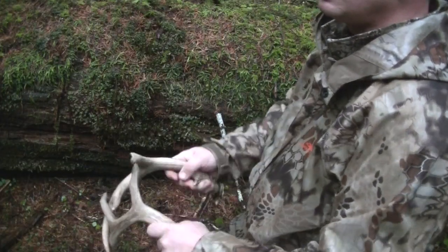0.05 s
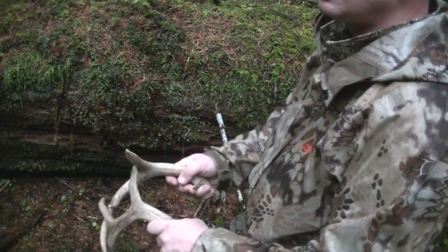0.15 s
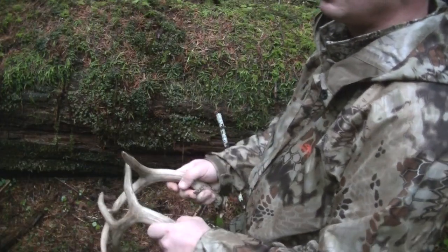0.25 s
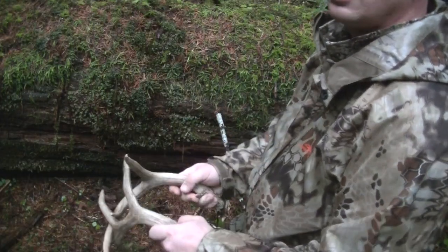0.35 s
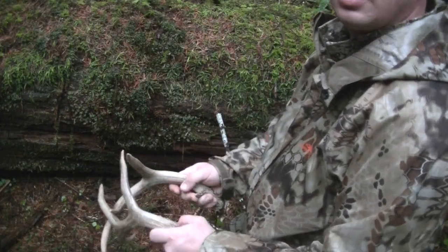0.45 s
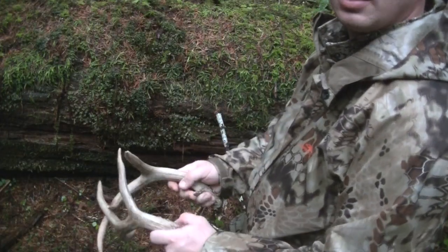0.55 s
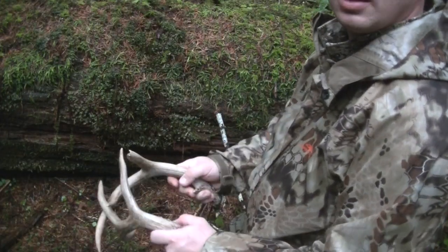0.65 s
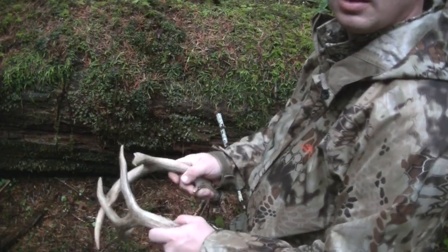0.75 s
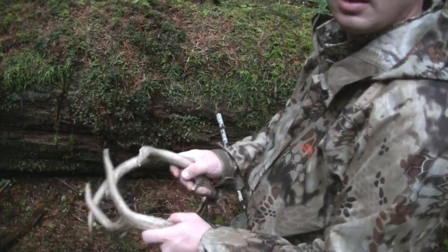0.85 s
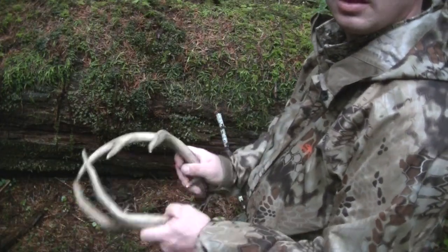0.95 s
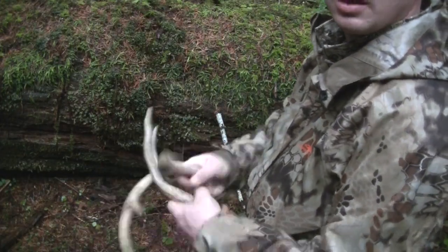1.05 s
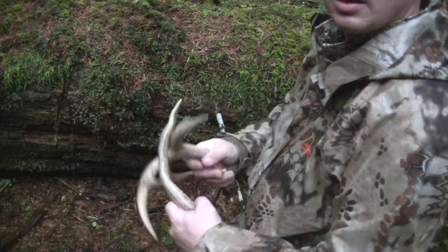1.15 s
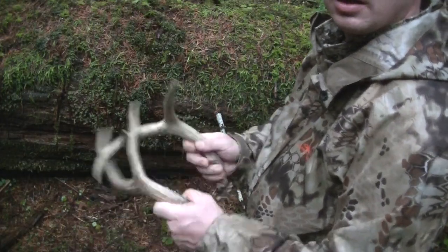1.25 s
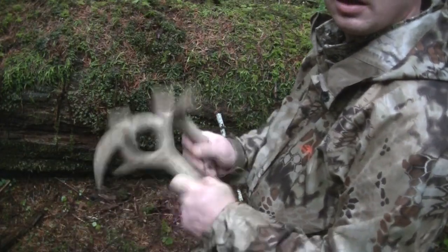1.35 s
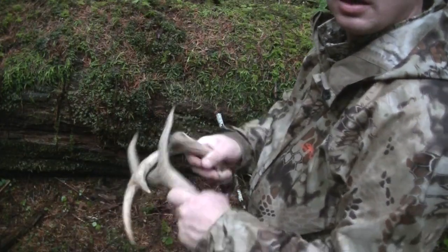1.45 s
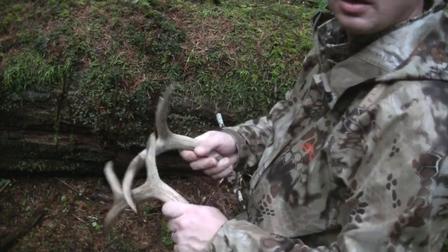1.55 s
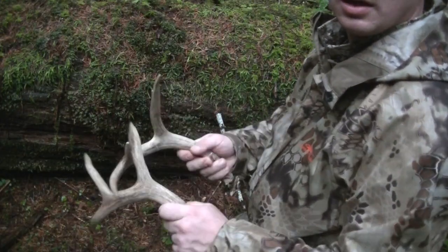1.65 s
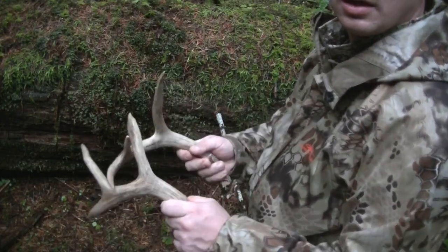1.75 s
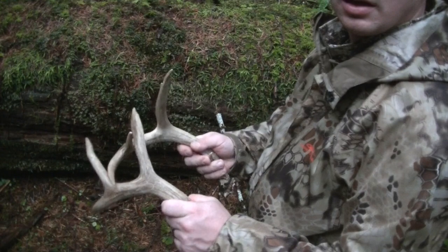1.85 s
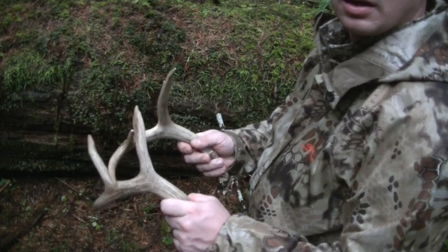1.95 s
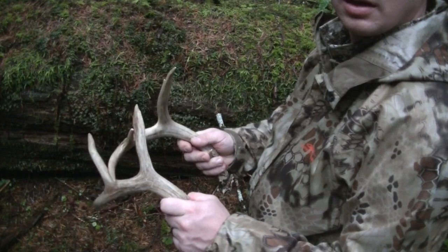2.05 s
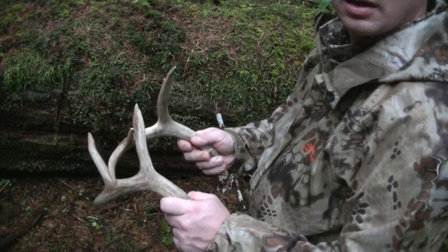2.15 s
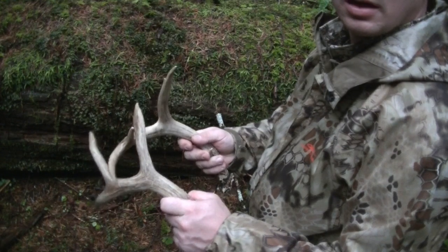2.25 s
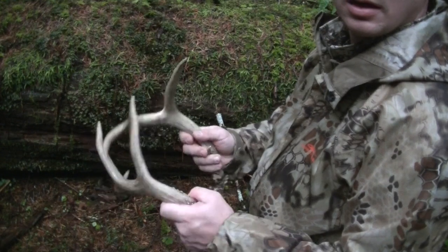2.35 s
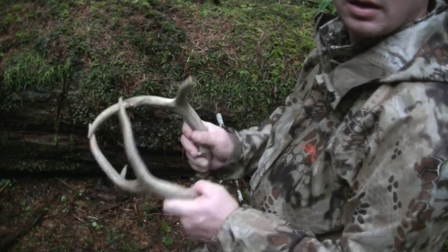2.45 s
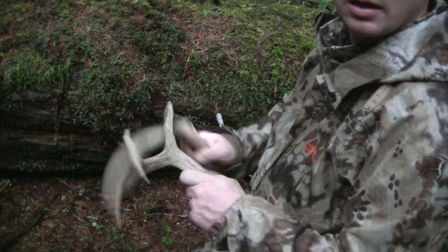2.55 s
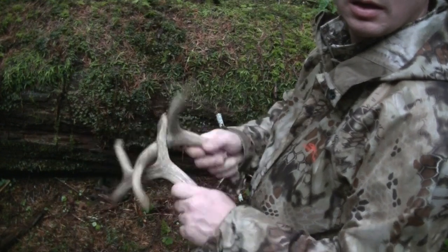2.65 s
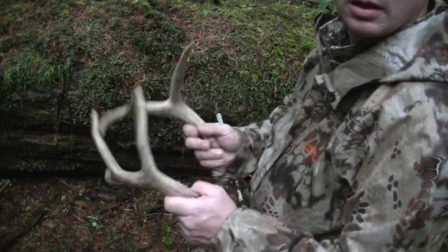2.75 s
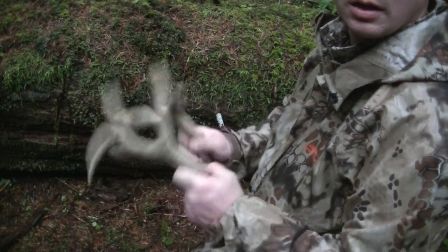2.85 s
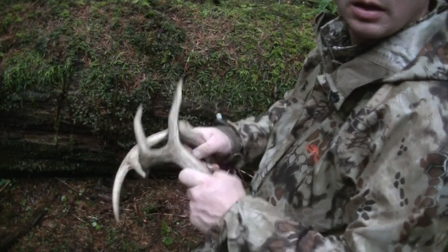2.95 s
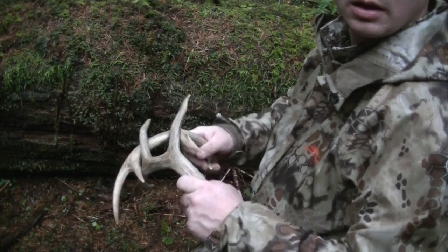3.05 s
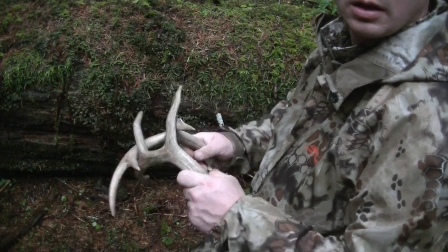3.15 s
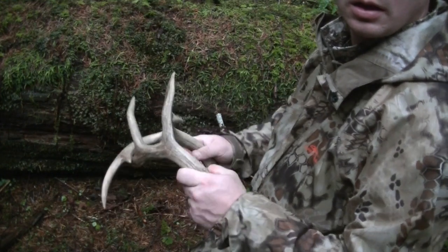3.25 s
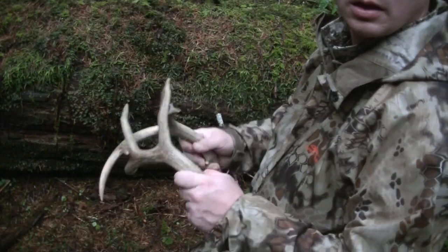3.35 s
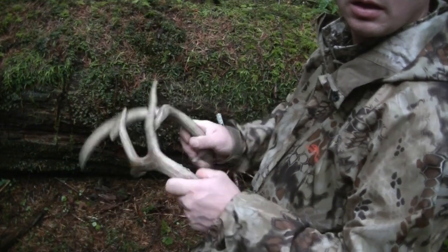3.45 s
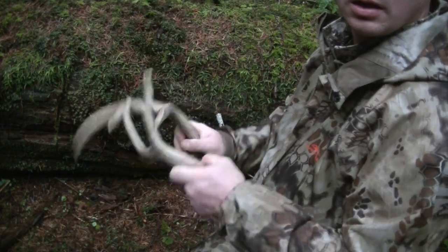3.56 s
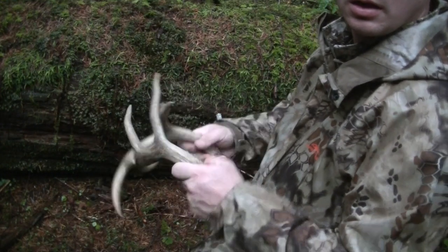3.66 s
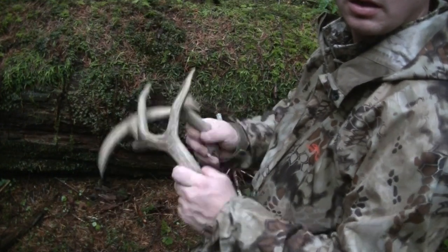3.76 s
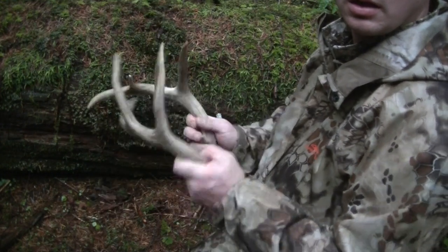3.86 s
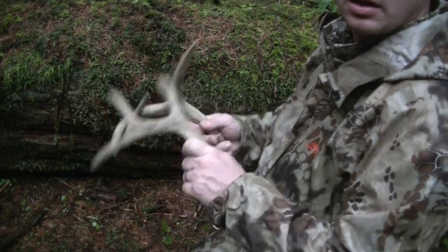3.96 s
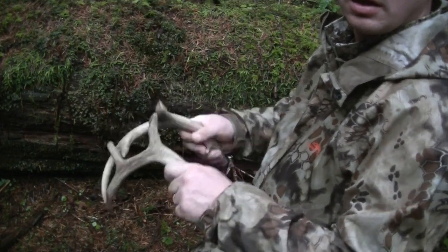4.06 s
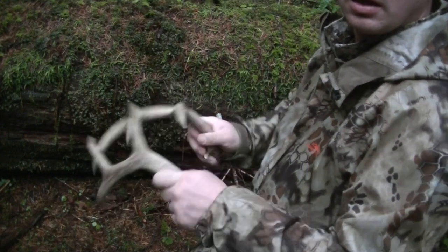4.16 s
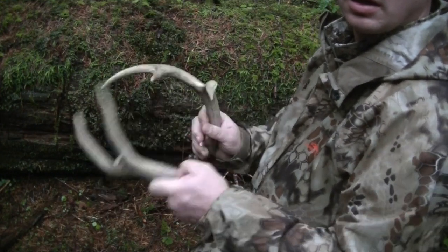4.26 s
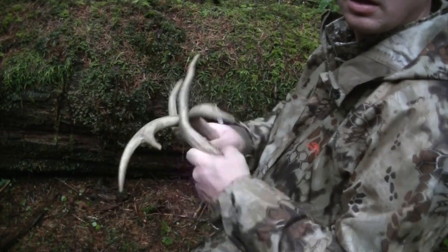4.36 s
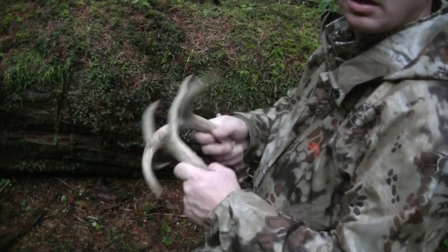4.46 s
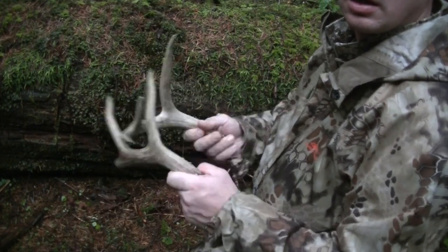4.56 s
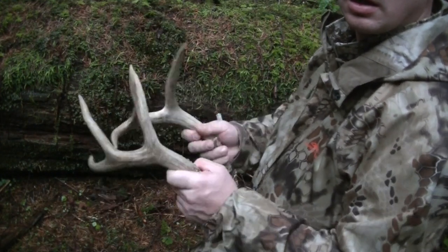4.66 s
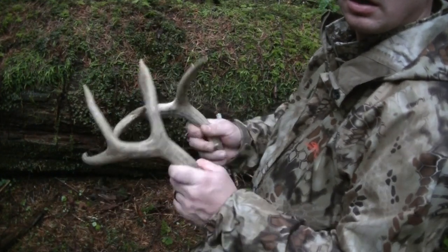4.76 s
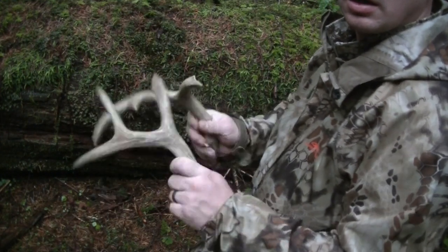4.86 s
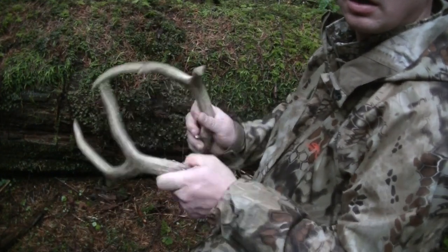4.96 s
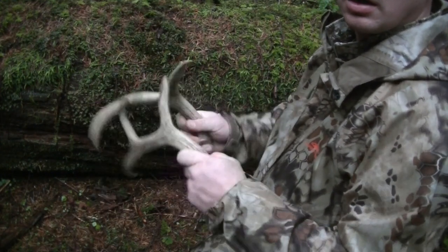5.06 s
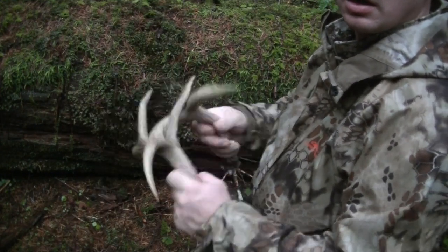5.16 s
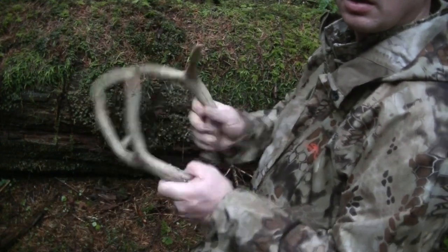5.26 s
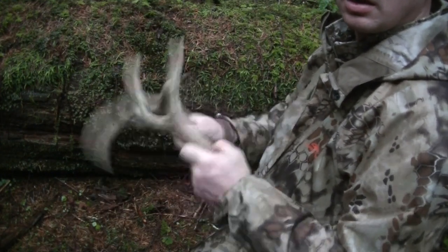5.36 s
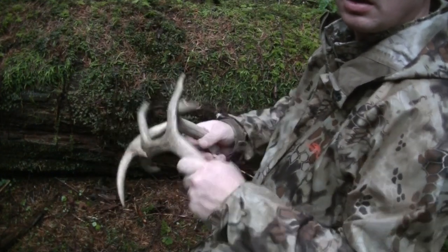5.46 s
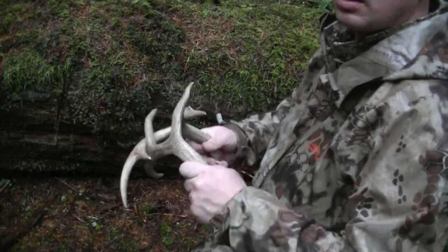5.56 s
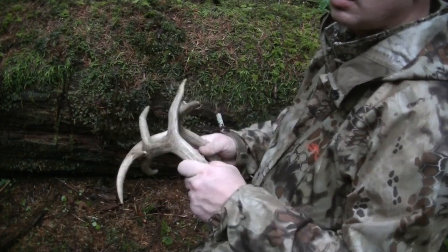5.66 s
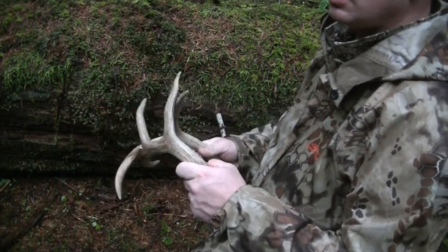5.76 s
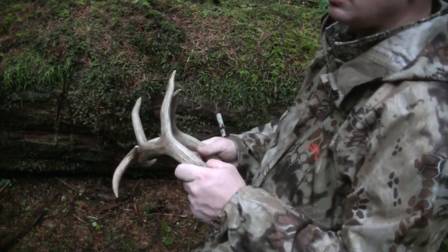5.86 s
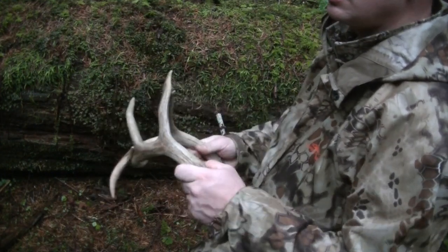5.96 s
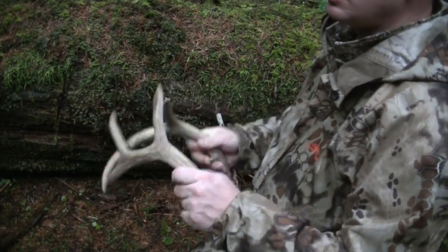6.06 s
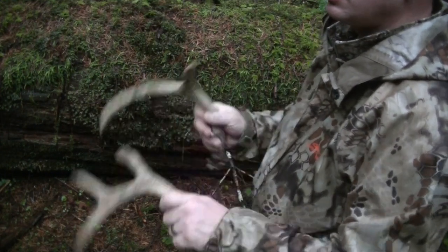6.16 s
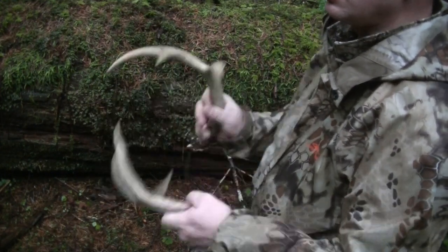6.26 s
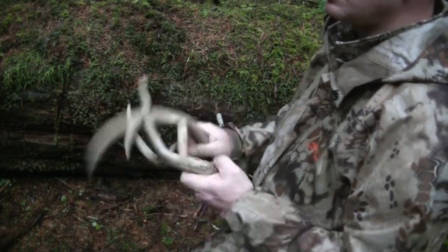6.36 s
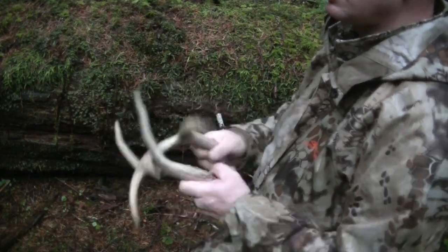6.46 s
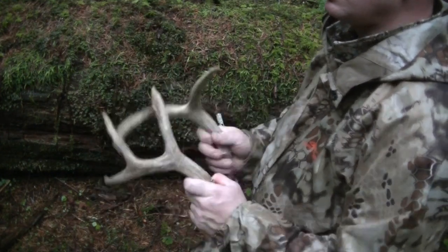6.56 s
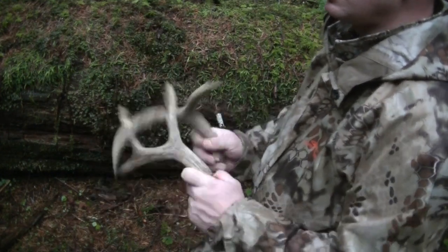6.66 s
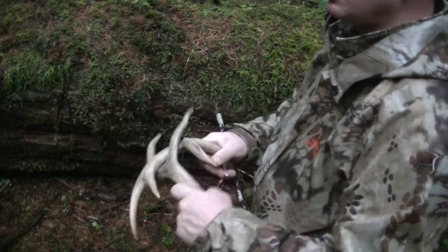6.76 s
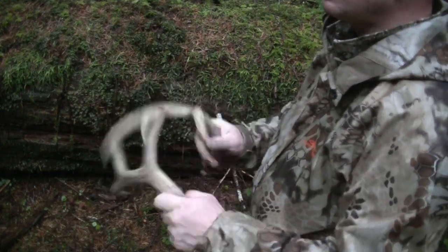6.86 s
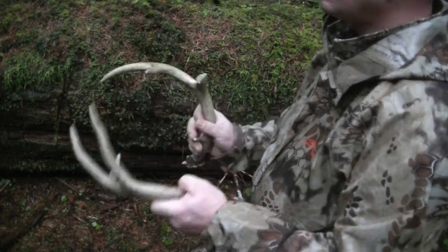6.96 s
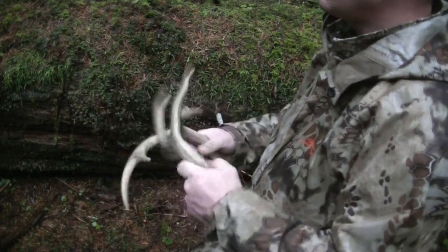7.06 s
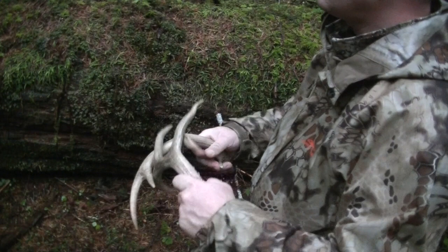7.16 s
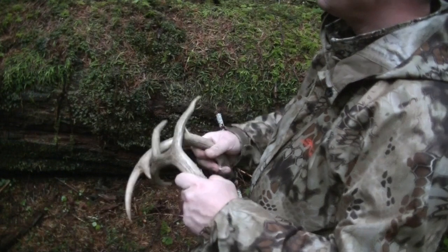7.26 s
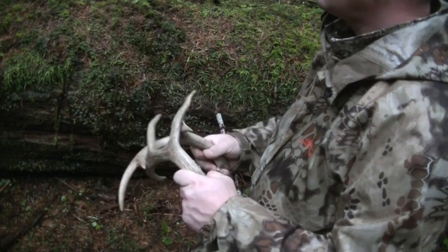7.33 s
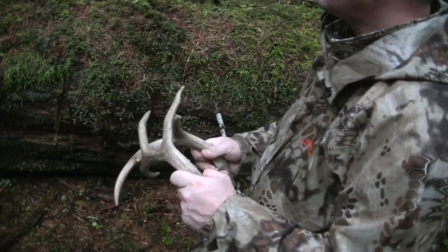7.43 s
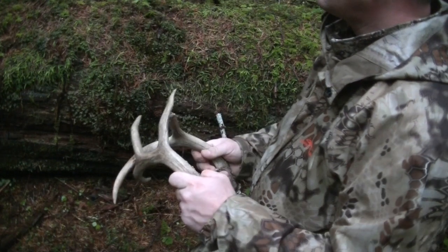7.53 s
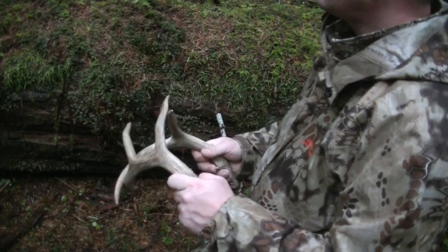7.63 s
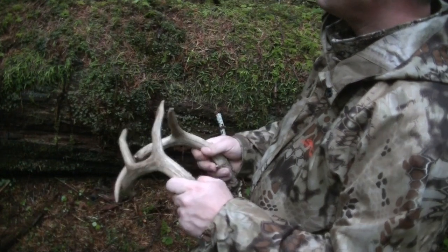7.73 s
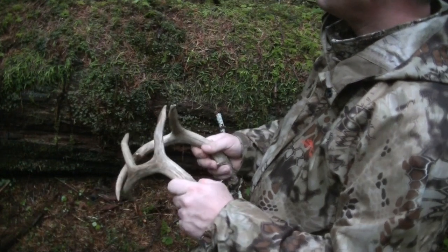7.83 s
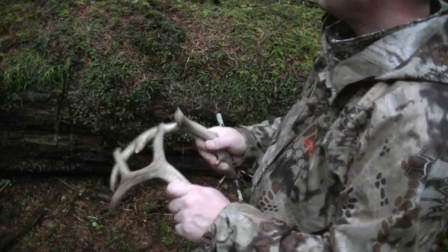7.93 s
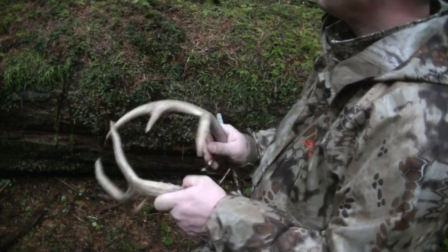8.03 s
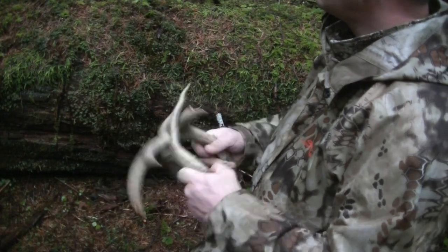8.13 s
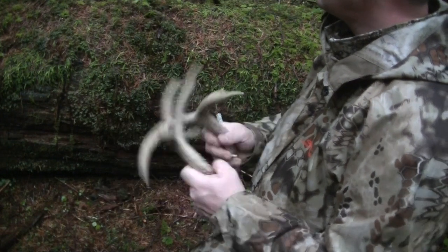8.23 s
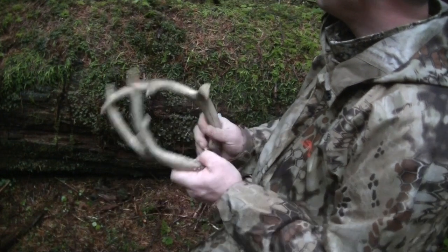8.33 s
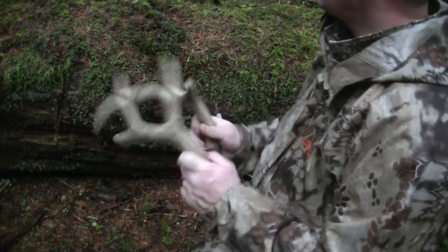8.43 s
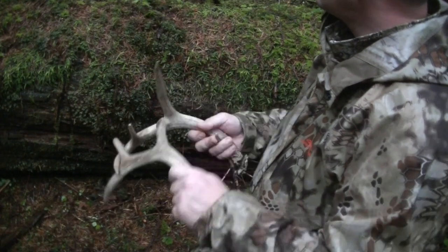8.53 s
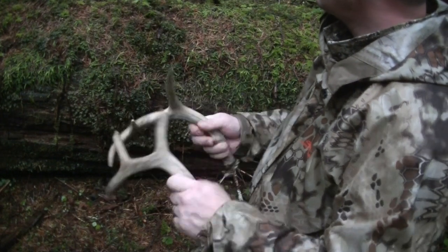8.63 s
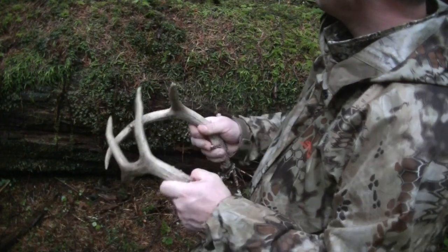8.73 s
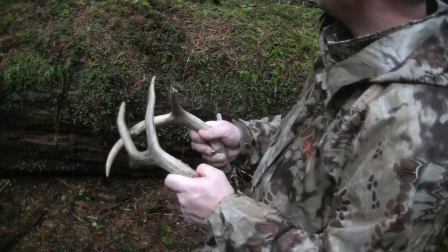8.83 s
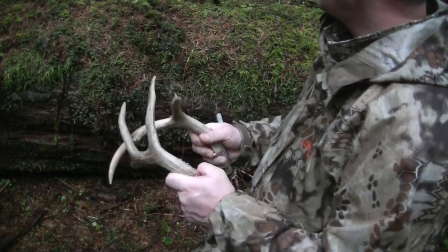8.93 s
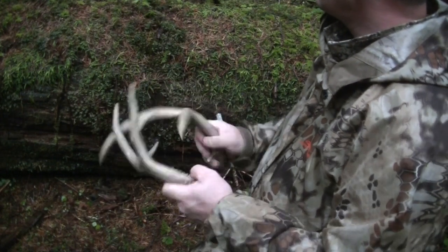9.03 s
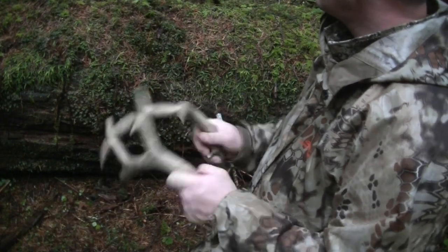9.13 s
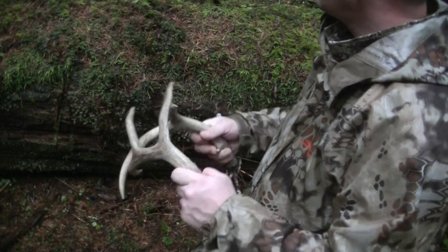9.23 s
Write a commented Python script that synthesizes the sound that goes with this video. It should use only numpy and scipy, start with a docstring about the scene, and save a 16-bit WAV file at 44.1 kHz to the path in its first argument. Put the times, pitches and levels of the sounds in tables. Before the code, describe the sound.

Two deer antlers are clashed and ground together by hand in sharp, dry, bony clacking bursts, close up in a quiet forest.

```python
"""Two deer antlers are clashed and ground together by hand, close to a microphone in a quiet forest.
Each blow sums an impact, decaying noise and bending modes, and a fainter second touch follows it.
Sliding is a run of tiny slips; palms thud on the beams, and one tine springs clear and rings on.
Shaped noise makes the swish of jacket sleeves, the hush of the woods and the echo from the trees.
The loudest peaks overload the microphone and flatten."""
import sys
import numpy as np
from scipy import signal
from scipy.fft import rfft, irfft, next_fast_len
from scipy.io import wavfile
from scipy.ndimage import map_coordinates

SR = 44100
rng = np.random.default_rng(int(sys.argv[2]) if len(sys.argv) > 2 else 0)


def transcribe(signal):
    """Save signal, clipped to [-1, 1], as a 16-bit WAV file at the path in sys.argv[1]."""
    frames = np.atleast_2d(signal).T
    limited = np.clip(frames, -1, 1)
    pcm = np.round(limited * 32767).astype(np.int16)
    wavfile.write(sys.argv[1], SR, pcm)


N = 409688

# overall colour of bone on bone: (frequency [Hz], relative level [dB])
BONE_COLOUR = [(30, -55), (130, -24), (400, -16), (950, -5), (1800, -9), (2800, -2), (4600, -1),
               (6100, -13.5), (7700, -17), (9700, -15.5), (12300, -30), (15500, -35)]
MIDDLING_DB, MIDDLING_HZ = -14.5, 2154  # strength and tine note of a middling blow


def amp(db):
    """Level to amplitude: 20 dB is a factor of ten."""
    return 10 ** (np.asarray(db) / 20)


def unit(x):
    """Normalization to an rms of 1."""
    return x / np.sqrt(np.mean(x ** 2) + 1e-20)


def along(points, hz):
    """Linear interpolation of (frequency, value) points over log frequency."""
    f, v = np.transpose(points)
    return np.interp(np.log(hz + 1), np.log(f + 1), v)


def filtered(x, response):
    """Linear filtering: the spectrum of x times a response of frequency."""
    m = next_fast_len(N + SR // 2)
    spectrum = rfft(x, m) * response(np.fft.rfftfreq(m, 1 / SR))
    return irfft(spectrum, m)[..., :N]


def causal(gain):
    """Minimum-phase response with this gain, by folding the cepstrum onto positive time."""
    cepstrum = irfft(np.log(np.maximum(gain, 1e-6)))
    half = len(cepstrum) // 2
    cepstrum[1:half] *= 2
    cepstrum[half + 1:] = 0
    return np.exp(rfft(cepstrum))


def add(track, s, x):
    """Superposition: mix x into the track from time s [s]."""
    i = max(round(s * SR), 0)
    part = track[..., i:i + x.shape[-1]]
    part += x[..., :part.shape[-1]]


def wobble(rate):
    """Random modulation: a smooth curve through random knots, rate knots a second."""
    knots = rng.standard_normal(int(N * rate / SR) + 4)
    return map_coordinates(knots, [np.arange(N) * rate / SR])


def rush(spectrum, alike):
    """Stereo noise of rms 1: the mid-side balance sets the left-right correlation by frequency."""
    def mid_side(hz):
        angle = np.arccos(np.clip(along(alike, hz), -1, 1)) / 2
        return amp(along(spectrum, hz)) * [np.cos(angle), np.sin(angle)]

    mid, side = filtered(rng.standard_normal((2, N)), mid_side)
    return unit(np.array([mid + side, mid - side]))


def forest():
    """The steady hush of the woods: stationary coloured noise with partial left-right correlation."""
    # colour of the hush: (frequency [Hz], relative spectral density [dB])
    hush = [(15, -41), (25, -24), (108, -9.5), (206, -7), (326, -10), (373, -6.5), (416, -6.5), (1020, -8),
            (1190, -7.5), (3920, -14.5), (16000, -32.5)]
    # left-right likeness: (frequency [Hz], correlation [-1 to 1])
    likeness = [(60, -0.49), (180, -0.33), (550, 0.4), (1650, 0.81), (4970, 0.6), (15000, -0.22)]
    return amp(-50.5) * rush(hush, likeness)


def sleeves(flutter_db=2.6, rustle_db=-66, swing_s=.062):
    """Cloth friction: broadband noise swells as the arms swing, over a faint rustle."""
    # arm swings that brush the sleeves: (time of the peak [s], level [dB])
    swings = [(1.008, -51), (1.16, -48), (1.533, -51), (2.58, -49), (3.436, -51), (3.56, -48),
              (3.872, -45.5), (4.073, -56), (4.25, -43.5), (4.517, -47), (5.388, -43), (5.658, -50.5),
              (6.164, -49.5), (6.376, -46.5), (6.532, -41.5), (6.66, -46.5), (8.072, -47), (8.31, -53),
              (8.443, -49.5), (9.23, -49)]
    # colour of the cloth: (frequency [Hz], relative spectral density [dB])
    cloth = [(300, -2.5), (1500, 9.5), (4500, 6), (6500, 0.5), (9400, 7.5), (12500, -3.5), (15500, -6)]
    t = np.arange(N) / SR
    power = amp(rustle_db) ** 2
    for s, db in swings:
        # amplitude falls to 1/e at swing_s either side of the peak
        power = power + amp(db) ** 2 * np.exp(-2 * np.minimum(((t - s) / swing_s) ** 2, 20))
    return np.sqrt(power) * amp(flutter_db * wobble(81)) * rush(cloth, [(500, 1.0), (10000, 0.92)])


def modes(t, scatter_db, detune, t60_at_1khz=0.064):
    """Modal ring: high modes die first, and the point of contact and the grip change each mode a little."""
    # bending modes of the hand-held antlers: (frequency [Hz], relative level [dB])
    bending = [(232, -6.5), (325, -2.5), (440, -3.5), (538, -1), (730, -1.5), (830, -5.5), (1108, -7),
               (1340, -3), (1550, 4), (1787, 6.5), (2010, 0), (2164, 4), (2700, -9), (3326, 2.5), (3908, 3),
               (4380, -1), (4748, -11), (6804, 8.5), (9345, -8.5)]
    hz, db = np.transpose(bending)[:, :, None]
    spread, shift, sign = rng.standard_normal((3, len(bending), 1))
    t60 = 2 * t60_at_1khz / (1 + (hz / 1000) ** 1.25)
    decay = amp(db + scatter_db * spread - 60 * t / t60)
    vibration = np.sin(2 * np.pi * hz * (1 + detune * shift) * t)
    return np.sum(np.sign(sign) * decay * vibration, axis=0)


def voicing(z, hz, register_db, count=3):
    """Spectral balance: a smooth gain brings the power in four registers close to the given levels."""
    # limits between knock, clack, bite and snap: (frequency [Hz])
    edges = [1000, 2500, 5500]
    # centres of these four registers: (frequency [Hz])
    centres = [700, 1700, 3900, 7500]
    register, gain_db = np.digitize(hz, edges), np.zeros(len(hz))
    for _ in range(count):
        energy = np.bincount(register, np.abs(z * amp(gain_db)) ** 2) / len(hz)
        power = energy / (SR / 100)  # mean square over 10 ms
        gain_db = gain_db + along(np.c_[centres, register_db - 10 * np.log10(power)], hz)
    return amp(gain_db)


def contact(ring_hz, register_db, crack_t60=0.01, crack_db=2, rebound_db=-5, rebound_s=0.00203,
            modes_db=-1, buzz_t60=0.076, buzz_db=-3, buzz_hz=5500, tine_cycles=45, tine_db=-1,
            impact_db=-5, size=4096):
    """Impact excitation: impulse, crack, rebound, bending modes, dense weak modes and the tine's note."""
    t, hz = np.arange(size) / SR, np.fft.rfftfreq(size, 1 / SR)

    def burst(t60):
        return unit(rng.standard_normal(size) * amp(-60 * t / t60))

    rebound = np.roll(burst(crack_t60), round(rng.uniform(0.17, 1) * rebound_s * SR))
    buzz = burst(buzz_t60)  # dense weak modes
    lowpass = signal.butter(2, buzz_hz, fs=SR)
    soft = signal.lfilter(*lowpass, amp(buzz_db) * buzz + amp(rebound_db) * rebound)
    ring = unit(modes(t, scatter_db=4, detune=.03))
    impact = amp(impact_db) * unit(signal.unit_impulse(size))
    blow = impact + amp(crack_db) * burst(crack_t60) + soft + amp(modes_db) * ring
    blow = unit(irfft(rfft(blow) * causal(amp(along(BONE_COLOUR, hz)))))
    # bone loses the same share of its energy in every cycle, so high tines ring for less time
    cycles = ring_hz * t
    decay = amp(-60 * cycles / tine_cycles)
    tine = unit(np.sin(2 * np.pi * cycles) * decay * (1 - np.exp(-cycles)))
    z = rfft(blow + amp(tine_db + along(BONE_COLOUR, ring_hz)) * tine)
    return irfft(z * causal(voicing(z, hz, register_db)))


def echo(far_db=-25, near_db=-20, near_t60=0.16, near_width=0.089):
    """Diffuse reverberation: ground and a nearby bank scatter sound briefly, the trunks for longer."""
    # decay of the trunks' echo: (frequency [Hz], time to fall 60 dB [s])
    t60 = [(200, 0.88), (1500, 0.64), (3500, 0.97), (7000, 0.73), (14000, 0.4)]
    # colour of the trunks' echo: (frequency [Hz], relative level [dB])
    colour = [(150, 0), (700, 3), (1800, -2.5), (3400, 2.5), (4900, -0.5), (7000, 3), (14000, -5)]
    hz, t, z = signal.stft(rng.standard_normal((2, SR)), SR, nperseg=256)
    decay_db = along(colour, hz)[:, None] - 60 * t / along(t60, hz)[:, None]
    far = signal.istft(z * amp(decay_db), SR, nperseg=256)[1]
    far = far + .5 * far[::-1]  # each channel leaks into the other
    t = np.arange(far.shape[1]) / SR
    near = rng.standard_normal(len(t)) + near_width * rng.standard_normal(far.shape)
    near = near * amp(-60 * t / near_t60)
    onset = 1 - np.exp(-(t / 0.0015) ** 2)
    return (amp(far_db) * unit(far * onset) + amp(near_db) * unit(near * onset)) / np.sqrt(len(t))


def lingering(ago_s=.02, level_db=4, count=3):
    """Reverberant decay: the echo of an earlier clash still hangs in the trees."""
    wet = np.zeros((2, N))
    for _ in range(count):
        blow = contact(2240, [-20, -11, -14, -20.0], modes_db=-11, tine_db=-13)
        tail = signal.fftconvolve(blow[None], echo(), axes=1)
        add(wet, 0, amp(level_db) / np.sqrt(count) * tail[:, round(ago_s * SR):])
    return wet


def grinding(slips_per_s=600, spread_db=5, ring_db=-1, squeak_db=-2, size=2048):
    """Stick-slip friction: ridges slip over each other in a run of tiny blows, with a squeak."""
    # tines sliding along each other: (middle of the stroke [s], length [s], level [dB])
    strokes = [(0.01, 0.018, -31.5), (0.965, .05, -49.5), (1.102, 0.11, -26.5), (1.425, 0.032, -34.5),
               (2.581, 0.074, -34.5), (3.53, 0.069, -48), (4.019, 0.053, -30), (4.229, 0.055, -39.5),
               (4.377, 0.0084, -27), (4.716, 0.05, -46), (5.15, 0.074, -31), (5.309, 0.076, -36),
               (6.152, 0.058, -42), (6.393, .012, -32), (6.68, .035, -27), (6.73, 0.043, -41),
               (8.029, 0.037, -33), (8.224, 0.044, -32.5), (8.341, .05, -35.5), (8.423, 0.036, -43.5),
               (8.562, 0.062, -26)]
    squeak_hz, squeak_width_hz = 1950, 350  # the tine note that sliding excites most
    track, t = np.zeros(N), np.arange(size) / SR
    colour = causal(amp(along(BONE_COLOUR, np.fft.rfftfreq(size, 1 / SR))))
    squeak = signal.iirpeak(squeak_hz, squeak_hz / squeak_width_hz, fs=SR)
    for s, length, db in strokes:
        n = round(length * SR)
        slips = (rng.random(n) < slips_per_s / SR) * amp(spread_db * rng.standard_normal(n))
        tick = unit(rng.standard_normal(size) * amp(-60 * t / 0.002))
        tick = tick + amp(ring_db) * unit(modes(t, scatter_db=-1.5, detune=0.017))
        stroke = signal.fftconvolve(slips * np.hanning(n), irfft(rfft(tick) * colour))
        stroke = unit(stroke) + amp(squeak_db) * unit(signal.lfilter(*squeak, stroke))
        # the whole energy, tail included, is referred to the stroke's length
        add(track, s - length / 2, amp(db) * unit(stroke) * np.sqrt(n / len(stroke)))
    return track


def registers(db, ring_hz, hardness_db, knock_db):
    """Contact stiffness: hardness, strength and tine note set clack, bite and snap; knock is given per blow."""
    # rows clack, bite, snap: (share in a middling blow [dB], growth with hardness [dB per dB],
    # growth with strength [dB per dB], growth with tine note [dB per octave])
    growth = [(-3, -0.41, 0.03, -1), (-5, 0.26, -0.09, 0), (-13, 0.82, 0.17, -4)]
    upper = np.dot(growth, [1, hardness_db, db - MIDDLING_DB, np.log2(ring_hz / MIDDLING_HZ)])
    share = amp(np.r_[knock_db, upper])
    return db + 20 * np.log10(share / np.linalg.norm(share))


def clashes(level_db=1):
    """Collision of solids: hard tips crack briefly, and tines still pressed together chatter louder."""
    # tine strikes tine: (time [s], relative strength [dB], tine note [Hz],
    # hardness as treble over bass [dB], share of the beam's low knock before normalization [dB])
    blows = [(0.0218, -17.5, 1780, -10, -10.5), (0.06, -30, 2820, -2.5, -21),
             (1.0513, -23.5, 1990, 1.5, -24), (1.0653, -23, 1720, 8, -29), (1.0759, -21, 1540, -5.5, -25),
             (1.0943, -22.5, 1840, -8, -21), (1.1086, -11.5, 1825, 4, -20.5),
             (1.1294, -14.5, 2080, -2, -12), (1.3435, -30.5, 1680, 3, -10), (1.354, -12.5, 1853, 1, -21),
             (1.3743, -22, 2600, 2, -29), (1.4456, -13.0, 2570, 3, -15), (1.4663, -12, 4800, 3, -17),
             (1.7491, -24, 3500, 2, -21), (2.5413, -22.5, 3650, 9.5, -29), (2.575, -33, 1660, -9, -24),
             (2.584, -35, 2340, -3, -28), (2.6094, -12.5, 3900, 2.5, -22.5),
             (2.6226, -17.5, 2580, -0.5, -11.5), (2.6527, -13.5, 1880, -5, -18),
             (2.6587, -23.5, 1840, -8, -8), (2.8008, -18, 1110, -6.5, -14.5), (2.8175, -30, 1410, -3, -17),
             (2.9485, -11, 2450, 7.5, -26), (2.9731, -10.5, 1466, -1, -14), (2.9807, -21, 1380, -12, -14),
             (3.6435, -16, 1770, -2.5, -18.5), (3.6531, -21, 1760, -10, -28),
             (3.6909, -11.5, 1780, -10, -13.5), (3.7024, -19.5, 2250, -1.5, -18),
             (3.9855, -12, 2160, -2, -17.5), (4.0016, -10, 2120, -12.5, -10), (4.0319, -22, 2100, -12, -15),
             (4.07, -22.5, 3900, -3.5, -17), (4.383, -13, 1980, 5, -25.5), (4.3983, -21, 1830, -1, -14),
             (4.413, -13, 3820, 4.5, -14), (4.4304, -16.5, 2000, -6.5, -7), (4.6534, -24, 1780, -8.5, -11),
             (4.6909, -30, 1525, -6.5, -13), (4.9616, -17.5, 4170, 7.5, -15), (4.9733, -21.5, 2280, 3, -25),
             (5.099, -14.5, 2600, 12.5, -21.5), (5.1134, -14.5, 1620, 5, -26),
             (5.1356, -13.0, 1740, 4, -20), (5.151, -19, 4770, 7, -23), (5.1585, -21, 1330, 2.5, -16),
             (5.1954, -15, 1840, -3.5, -16.5), (5.2217, -15, 3070, -1.5, -13),
             (5.2958, -31.5, 1730, -12, -12), (5.4305, -14, 1790, 8, -13.5), (5.445, -12.5, 1870, 3.5, -29),
             (5.4558, -15, 1930, -3, -20), (5.8641, -34, 2260, -14, -13.5), (5.974, -39, 2160, -2, -14),
             (6.0901, -22, 1920, -12, -13.5), (6.1986, -17.5, 4870, 7, -28.5), (6.397, -14, 2594, 1, -18.5),
             (6.4232, -13, 1800, 5, -22), (6.4383, -23.5, 1780, -14, -9), (6.447, -21, 2280, -4, -18),
             (6.6334, -30.5, 1510, -10.5, -7), (6.6688, -21, 2240, 2, -27), (6.6809, -22, 2030, 1, -18.5),
             (6.761, -13.5, 1670, 1, -16), (6.7748, -19, 1860, -3, -16), (6.782, -13, 1810, -5, -14),
             (6.9354, -18, 4650, 10, -18), (6.9593, -19, 3990, 14, -14.5), (7.1112, -14, 1700, 10.5, -16.5),
             (7.1249, -13.5, 1850, -3, -19.5), (7.142, -19.5, 2250, -1, -14.5),
             (7.1673, -27, 1820, -12, -5), (7.9585, -41, 1310, -13, -10), (7.9918, -14.5, 2280, 2.5, -23.5),
             (8.0202, -24.5, 3870, 1, -15), (8.0558, -19.5, 2180, 5.5, -18),
             (8.1032, -21.0, 3880, 7.5, -22), (8.168, -12.0, 1920, -1.5, -17),
             (8.189, -18.5, 2000, -6, -10), (8.1994, -13, 3380, 8.5, -26), (8.2095, -27.5, 1390, -7, 0.5),
             (8.3291, -30.5, 1640, -12, -3), (8.3608, -14, 1860, 1, -16.5), (8.3999, -27, 1810, -7, -20),
             (8.519, -11, 2930, 8.5, -20.5), (8.5321, -12.5, 2140, 2, -25), (8.5655, -18.5, 1570, -10, -14),
             (8.581, -19.5, 2100, -12, -18), (8.5946, -18, 2220, -8, -19), (8.9288, -33, 3000, 3, -17),
             (9.1291, -15, 1880, -1.5, -27), (9.1501, -19.5, 1710, -1, -26), (9.2345, -11, 1910, 2, -25.5),
             (9.2545, -16.5, 2130, -6, -36), (9.2618, -21.5, 1890, -3, -16)]
    crack_t60, halving_db = 0.016, 21  # s at zero hardness, and the gain in hardness that halves it
    lock_s = 0.044  # antlers that met a moment ago are still pressed together
    free_chatter_db, locked_chatter_db = -29, -15  # relative to the blow
    chatter_s, chatter_spread = .013, .3  # the tines touch once more: delay and its log scatter
    track, last_s = np.zeros(N), -np.inf
    for s, db, ring_hz, hardness_db, knock_db in blows:
        blow = contact(ring_hz, registers(db, ring_hz, hardness_db, knock_db),
                       crack_t60=crack_t60 * .5 ** (hardness_db / halving_db),
                       tine_db=-1 - 0.13 * hardness_db)
        add(track, s, blow)
        locked, last_s = np.exp((last_s - s) / lock_s), s
        chatter_db = db + free_chatter_db + locked * (locked_chatter_db - free_chatter_db)
        delay = chatter_s * np.exp(chatter_spread * rng.standard_normal())
        levels = registers(chatter_db, MIDDLING_HZ, hardness_db=-3, knock_db=-12)
        add(track, s + delay, contact(MIDDLING_HZ, levels))
    return amp(level_db) * track


def trees(x, count=10, directions=2, smear_per_s=700):
    """Scattering: a diffuse echo from a few directions, its pitch blurred by random modulation."""
    wet = np.zeros((2, N))
    for _ in range(directions):
        smear = np.sin(2 * wobble(smear_per_s) + np.pi / 4)
        scattered = x * np.sqrt(2 / directions) * smear
        # every stretch of the sound gets an echo of its own
        for k, part in enumerate(np.array_split(scattered, count)):
            add(wet, k * N / count / SR, signal.fftconvolve(part[None], echo(), axes=1))
    return wet


def grips(low_hz=390, high_hz=1000, thud_t60=0.033, tick_db=-3, tick_t60=0.028, size=4096):
    """Damped impact: a palm on the beam gives a dull thud with a dry tick and no ring."""
    # the hands shift their grip and nudge the beams: (time [s], relative level [dB])
    nudges = [(.706, -49), (.941, -42.5), (1.302, -42), (3.056, -36), (4.553, -44), (6.866, -42.5),
              (9.069, -36.5)]
    track, t = np.zeros(N), np.arange(size) / SR
    thud_band = signal.butter(2, [low_hz, high_hz], "band", fs=SR)
    tick_band = signal.butter(1, 2500, fs=SR)
    for s, db in nudges:
        thud = signal.lfilter(*thud_band, rng.standard_normal(size) * amp(-60 * t / thud_t60))
        tick = signal.lfilter(*tick_band, rng.standard_normal(size) * amp(-60 * t / tick_t60))
        add(track, s, amp(db - 9.0) * (unit(thud) + amp(tick_db) * unit(tick)))
    return track


def free_tine(waver_radians=1.5):
    """Free vibration: a tine that springs clear keeps a thin, decaying note with a wavering phase."""
    # the freed tine: (time [s], frequency [Hz], starting peak level [dB], time to fall 60 dB [s])
    s, hz, db, t60 = (8.2, 3619, -39, .55)
    t, track = np.arange(N) / SR, np.zeros(N)
    phase = 2 * np.pi * hz * t + waver_radians * wobble(60)
    add(track, s, np.sin(phase) * amp(db - 60 * t / t60))
    return track


def scene():
    """Stereo pickup: antlers straight ahead reach two microphone ports that differ as the tines move."""
    # side signal that changes with direction: (frequency [Hz], side over mid [dB])
    ports = [(1000, -24.5), (3000, -23), (4500, -15.5), (6100, -3.5), (9000, -14), (12000, -9)]
    # level balance of the ports: (frequency [Hz], left minus right [dB])
    balance = [(100, -1.5), (600, -2.5), (2600, 0.3), (3700, -2), (5600, -1), (7200, 3), (9500, 1),
               (11800, -2), (15500, 4)]
    # phase balance of the ports: (frequency [Hz], lead of left [rad])
    lead = [(250, -0.38), (900, 0.087), (3300, 0.035), (5300, 0.44), (6100, 1), (8000, -0.29),
            (10800, 0.28), (12700, 1)]
    antlers = clashes() + grinding() + grips() + free_tine()
    sides = np.array([[1], [-1]])  # left, right
    # the side signal stands a quarter cycle from the mid
    moving = filtered(antlers, lambda hz: 1j * amp(along(ports, hz)))
    moving = moving * np.sqrt(2) * np.sin(2 * wobble(25))

    def port_response(hz):
        return amp(sides * along(balance, hz) / 2) * np.exp(.5j * sides * along(lead, hz))

    direct = filtered(antlers + sides * moving, port_response)
    return direct + trees(antlers) + lingering() + sleeves() + forest()


def record(dry, ceiling=0.75, hardness=8, low_cut_hz=35, top_hz=15850):
    """Saturation and band limiting: peaks flatten, the deepest bass is cut, the top ends steeply."""
    clipped = dry / (1 + np.abs(dry / ceiling) ** hardness) ** (1 / hardness)
    thinned = signal.lfilter(*signal.butter(1, low_cut_hz, "high", fs=SR), clipped)
    return filtered(thinned, lambda hz: 1 / np.sqrt(1 + (hz / top_hz) ** 120))


dry = scene()
out = record(dry)
transcribe(out)
```